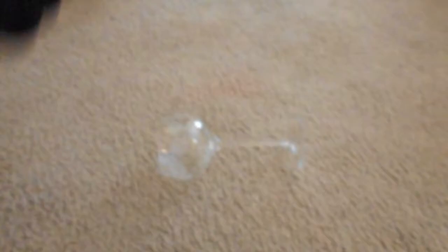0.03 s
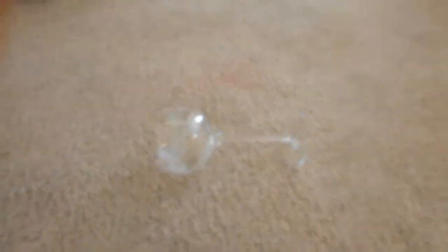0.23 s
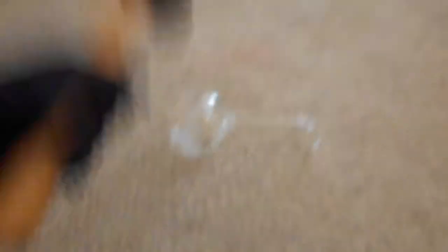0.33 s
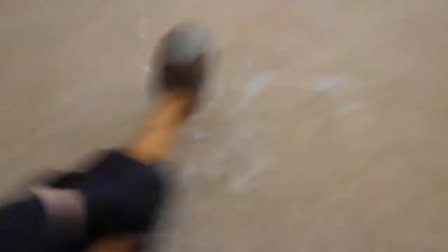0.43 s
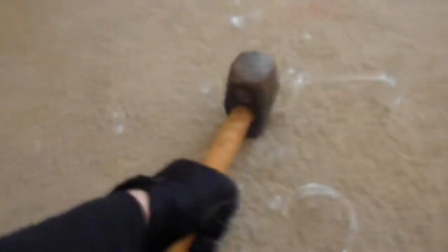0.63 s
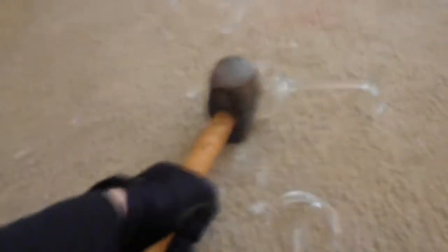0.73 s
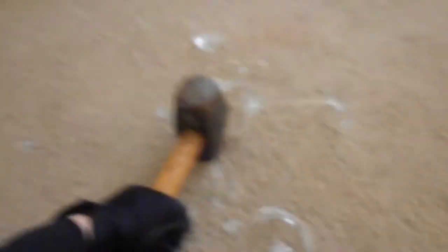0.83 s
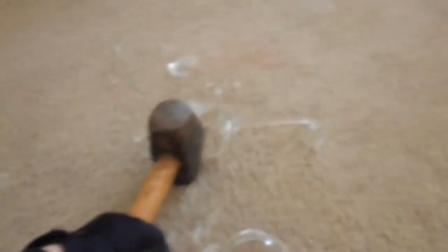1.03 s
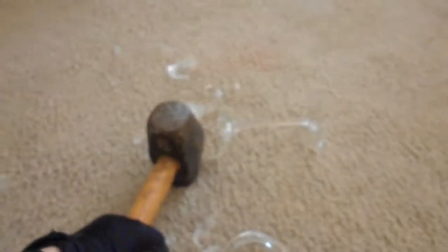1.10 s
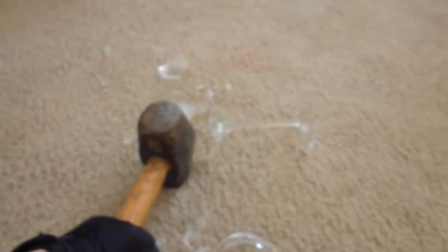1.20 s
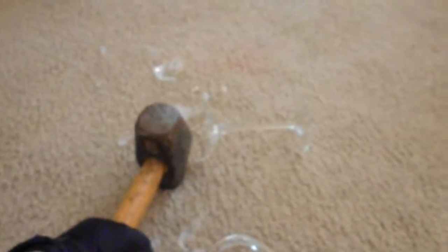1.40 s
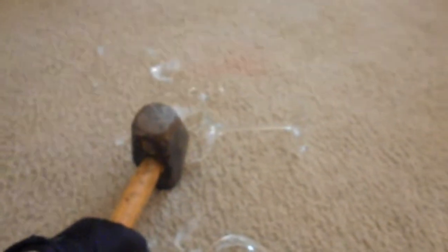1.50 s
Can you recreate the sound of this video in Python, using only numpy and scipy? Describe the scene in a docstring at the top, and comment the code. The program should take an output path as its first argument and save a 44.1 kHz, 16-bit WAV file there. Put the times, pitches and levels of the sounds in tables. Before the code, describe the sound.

A wine glass shatters under a hammer on carpet, shards clinking briefly afterwards.

```python
"""Hammer through a wine glass

A hammer smashes a wine glass lying on a carpet, in a small room. The bowl bursts in a dense run of
cracks, the head thuds through to the floor, shards clink against each other and grit patters down.
The recorder's gain control ducks at the blow, so hiss and rumble sink and slowly swell back."""
import sys
import numpy as np
from scipy import signal
from scipy.fft import rfft, irfft
from scipy.io import wavfile
from scipy.ndimage import uniform_filter1d, minimum_filter1d

SR = 44100
rng = np.random.default_rng(int(sys.argv[2]) if len(sys.argv) > 2 else 0)


def store_wav(level_fs):
    """Save 16-bit WAV to argv[1]."""
    pcm = np.round(np.clip(np.atleast_2d(level_fs), -1, 1) * 32767)
    wavfile.write(sys.argv[1], SR, pcm.T.astype(np.int16))


N = 68355
T = np.arange(N) / SR

# fader moves of the background bed: t/s, rumble level/dB, hiss level/dB
BED_LEVELS = [(0, -45.5, -57), (.2, -41.5, -53), (.4, -39.5, -51), (.6, -38, -39), (.75, -42, -51.5),
              (.9, -37.5, -51), (1.05, -42, -54), (1.3, -48, -55.5), (1.55, -43, -53)]
# tone curves of the rumble, hiss, scuff and cracks: f/Hz, relative spectral density/dB
RUMBLE_EQ = [(20, -4.5), (55, 4), (100, -3), (190, -5), (280, -16), (420, -32.5), (800, -72)]
HISS_EQ = [(200, 4.5), (550, 5.5), (1300, 1.5), (2200, -5), (4200, -1.5), (6500, -5.5), (10000, -8.5)]
SCUFF_EQ = [(300, -1), (700, -10), (1200, -4), (2200, -36), (6000, -36)]
CRACK_EQ = [(60, 4.5), (150, 2), (260, 5), (600, -3), (1300, -0.5), (2400, -5), (4000, -6), (6000, -5),
            (8500, 0), (10500, -0.5), (13000, -4.5)]
# small ticks during the swing: t/s, level/dB
SWING_TICKS = [(.1835, -37), (.268, -34), (.285, -41), (.3735, -27), (.3928, -34), (.4105, -38)]
# modes of each piece of glass, by name: f/Hz, relative level/dB, t60/s
SHARD_MODES = { "whole bowl": [(3760, -1, .07), (4290, -5, .12), (5650, 0, .12), (5770, -2, .1),
               (7073, -3, .1), (8629, -3, .1), (9410, -2, .08), (9590, -2, .1), (10424, -2, .12)],
               "broken bowl": [(3735, -5, .07), (4435, -14, .12), (5135, -11, .1), (5639, -10, .1),
               (6871, -11, .1), (7081, -5, .09), (7178, -10, .1), (7544, -13, .1), (8305, -11, .1),
               (9600, 0, .09), (9855, -4, .08), (10420, -11, .1)], "large": [(3727, 0, .37),
               (5122, -16, .35), (7179, -5, .42), (8295, -2, .2), (9608, -4, .08)],
               "curved": [(1848, -14, .8), (2735, -15, .6), (2785, -16, .5), (3972, -9, .27),
               (4400, -14, .3), (5122, -6, .25), (5636, -1, .2), (5787, -10, .2), (6023, -10, .28),
               (6355, -7, .28), (6385, -10, .22), (6863, -7, .2), (7090, -3, .2), (7668, -12, .2),
               (8296, -10, .13), (8644, -6, .25), (9640, 0, .18)], "medium": [(2770, -20, .15),
               (6030, 0, .135), (6857, -2, .085), (7669, -12, .13)], "narrow": [(4330, -14, .1),
               (5990, -11, .1), (7915, -2, .06)], "sliver": [(7088, 0, .08)], "flake": [(6025, -2, .13),
               (8947, 0, .04), (10562, -2, .07)], "chip": [(9087, 0, .12)], "speck": [(9603, 0, .1)],
               "shaving": [(5122, 0, .13)], "crumb": [(6850, 0, .06), (7060, -3, .03)]}
# hits on glass: t/s, piece, relative ring level/dB, tilt/(dB per octave), relative tick level/dB
SHARD_HITS = [(0.4212, "whole bowl", -15.5, -1.5, -15.5), (0.451, "broken bowl", -10.5, 1.5, -29.5),
              (0.463, "broken bowl", -7, -2, -19), (.477, "broken bowl", -4.5, 0, -19.5),
              (0.495, "curved", -15.5, 6, -18), (0.5247, "crumb", -22, 0, -9),
              (.561, "crumb", -22.5, -4, -12), (0.575, "sliver", -17, -2, -38),
              (.6248, "large", -33, -1, -21), (.6255, "narrow", -29, 0, -27), (.6685, "flake", -31, 0, -31),
              (.6805, "sliver", -29, 0, -13), (0.716, "narrow", -25.5, 0, -30),
              (.716, "large", -39, -4, -34), (.7463, "speck", -31, 0, -33), (.765, "crumb", -33, 0, -29),
              (.772, "crumb", -34, 0, -26), (.7972, "large", -28, 6, -22), (.806, "speck", -31, 0, -33),
              (.815, "shaving", -37, 0, -38), (.8488, "large", -32, -1, -28), (.87, "chip", -29, 0, -31),
              (.881, "chip", -34, 0, -29), (0.9588, "large", -44, 33, -19), (0.962, "medium", -30, 0, -36),
              (0.969, "medium", -27, 9, -32), (.988, "crumb", -29.5, -9.5, -23.5)]
# the head hits the carpeted floor: t/s, level/dB, starting f/Hz, final f/Hz, t60/s
FLOOR_HITS = [(0.447, 4.5, 356, 251, 0.024), (.469, -0.5, 1000, 286, .028)]
# force crushing the bowl: t/s, relative level/dB
CRUSH_FORCE = [(.42, 1.5), (.43, 0.5), (.446, -0.5), (.452, -4.5), (.475, -0.5), (.493, -3), (.501, -6.5),
               (.52, -18), (.545, -20.5), (.57, -32.5), (.61, -38)]


def from_db(db):
    """Decibels to gain."""
    return 10 ** (np.asarray(db) / 20)


def automation(rows):
    """Each column after the time column, drawn as a curve through every sample."""
    times, *columns = np.transpose(rows)
    return [np.interp(T, times, column) for column in columns]


def match_rms(x, envelope=1):
    """Scale a signal to the rms of an envelope."""
    return x * np.sqrt(np.mean(np.square(envelope)) / (np.mean(x ** 2) + 1e-20))


def equalise(x, curve):
    """Shape a steady signal with a tone curve; rms 1."""
    hz, db = np.transpose(curve)
    bins_hz = np.arange(N // 2 + 1) * SR / N + 1
    gain = from_db(np.interp(np.log(bins_hz), np.log(hz), db))
    return match_rms(irfft(rfft(x) * gain, N))


def decay(start, t60):
    """An envelope that jumps to 1 and dies away."""
    return (T >= start) * np.exp(-np.log(1000) * np.clip((T - start) / t60, 0, 10))


def ring(clicks, hz, t60):
    """One resonance: each click sets off a dying sine."""
    radius, angle = np.exp(-np.log(1000) / (t60 * SR)), 2 * np.pi * hz / SR
    feedback = [1, -2 * radius * np.cos(angle), radius ** 2]
    return signal.lfilter([0, np.sin(angle)], feedback, clicks + 1e-18)


def pings(clicks, pitches, t60_cycles):
    """Each click rings one fragment, picked at random; higher ones die sooner."""
    fragment = rng.integers(0, len(pitches), N)
    return sum(ring(clicks * (fragment == k), hz, t60_cycles / hz) for k, hz in enumerate(pitches))


def ticks(rows, t60, low_cut_hz):
    """Very short, bright bursts of contact noise."""
    bursts = rng.standard_normal(N) * sum(from_db(db) * decay(start, t60) for start, db in rows)
    return signal.sosfilt(signal.butter(3, low_cut_hz, "high", fs=SR, output="sos"), bursts + 1e-18)


def background():
    """The bed: low rumble and soft hiss of the room and the hand-held microphone."""
    rumble_db, hiss_db = automation(BED_LEVELS)
    rumble = from_db(rumble_db) * equalise(rng.standard_normal(N), RUMBLE_EQ)
    hiss = from_db(hiss_db) * equalise(rng.standard_normal(N), HISS_EQ)
    return rumble + hiss


def room(x, wet_db=-17, predelay_s=.008, t60=.25):
    """The short diffuse tail of a carpeted room."""
    tail = rng.standard_normal(N) * decay(predelay_s, t60)
    return from_db(wet_db) * signal.fftconvolve(x, tail / np.sqrt(np.sum(tail ** 2)))[:N]


def swing(squeak_hz=1346):
    """The lead-in: faint ticks, a scuff and one tiny squeak as the hammer comes down."""
    def swell(at_s, width_s, db):
        return from_db(db) * np.exp(-((T - at_s) / width_s) ** 2)

    squeak = swell(at_s=.3997, width_s=.0011, db=-31.5) * np.sin(2 * np.pi * squeak_hz * T)
    scuff = swell(at_s=.271, width_s=.0056, db=-45.5) * equalise(rng.standard_normal(N), SCUFF_EQ)
    return squeak + scuff + ticks(SWING_TICKS, t60=.0034, low_cut_hz=1500)


def grit(landings_per_s=260, base_db=-37, spread_db=3):
    """Tiny fragments land at random, each with a short ping, ever more softly."""
    pitches_hz = rng.uniform(5610, 10360, size=30)
    sizes = from_db(base_db + spread_db * np.minimum(rng.exponential(1, N), 2))
    landings = sizes * (rng.random(N) < landings_per_s / SR) * decay(start=.53, t60=.9)
    return pings(landings, pitches_hz, t60_cycles=220)


def clinks(ring_trim_db=1.5, spread_db=.6, pivot_hz=7100, settle_s=.96, damping_db_per_s=110):
    """Each collision gives a tick and adds energy to every mode of the shard that is hit."""
    glass = ticks([(start, db) for start, *_, db in SHARD_HITS], t60=.01, low_cut_hz=4800)
    for shard, modes in SHARD_MODES.items():
        hits = [(start, db, tilt) for start, piece, db, tilt, _ in SHARD_HITS if piece == shard]
        for hz, mode_db, t60 in modes:
            octaves = np.log2(hz / pivot_hz)
            energy = 0
            for start, hit_db, tilt in hits:
                strike_db = hit_db + mode_db + tilt * octaves + spread_db * rng.standard_normal()
                energy += (from_db(strike_db) * decay(start, t60)) ** 2
            envelope = uniform_filter1d(np.sqrt(energy), size=24)  # takes the edge off the attack
            glass += from_db(ring_trim_db) * envelope * np.sin(2 * np.pi * (hz * T + rng.random()))
    # the pieces come to rest and the carpet damps them
    return glass * from_db(-damping_db_per_s * np.maximum(T - settle_s, 0))


def thuds(attack_s=.0022, sag_s=.00273):
    """The weight: the head lands twice, each knock dropping in pitch as it sinks into the carpet."""
    knocks = 0
    for start, db, first_hz, last_hz, t60 in FLOOR_HITS:
        age = np.maximum(T - start, 0)
        cycles = last_hz * age + (first_hz - last_hz) * sag_s * (1 - np.exp(-age / sag_s))
        envelope = from_db(db) * decay(start, t60) * (1 - np.exp(-age / attack_s))
        knocks -= envelope * np.sin(2 * np.pi * cycles)
    return knocks


def cracks(per_s=7200, spread_db=4):
    """A dense random train of fractures of uneven size."""
    sizes = from_db(spread_db * np.minimum(rng.exponential(1, N), 3))
    polarity = rng.choice([-1, 1], N)
    return sizes * polarity * (rng.random(N) < per_s / SR)


def smash(crunch_db=-8.5, splinter_db=-16):
    """The bowl bursts: cracks sound directly as a crunch and set many splinters ringing."""
    contact_s, end_s = SHARD_HITS[0][0], CRUSH_FORCE[-1][0]
    force = from_db(automation(CRUSH_FORCE)[0]) * (T >= contact_s) * (T < end_s)
    crunch = force * equalise(cracks(), CRACK_EQ)
    pitches_hz = rng.uniform(3477, 10720, size=48)
    splinters = pings(cracks() * force, pitches_hz, t60_cycles=500)
    return from_db(crunch_db) * crunch + from_db(splinter_db) * match_rms(splinters, force)


def scene():
    """The mono mix: the blow and its debris with room tail, over the swing and the bed."""
    blow = smash() + thuds() + clinks() + grit()
    return (blow + room(blow) + swing() + background())[None]


def gain_control(x, threshold_db=-26, hold_s=.45, release_db_per_s=53):
    """Ducks just ahead of a loud sound, holds, then recovers at a steady rate."""
    level_db = 10 * np.log10(np.maximum(uniform_filter1d(x ** 2, size=600), 1e-12))
    over_db = np.maximum(level_db - threshold_db, 0)
    half_hold = int(hold_s * SR) // 2
    # the largest overshoot within the past hold time
    held_db = -minimum_filter1d(-over_db, 2 * half_hold + 1, origin=half_hold, mode="constant")
    release_ramp = release_db_per_s * T
    duck_db = np.maximum.accumulate(held_db + release_ramp) - release_ramp
    return x * from_db(-uniform_filter1d(duck_db, size=40))


def record(dry, ceiling=.13, high_cut_hz=10617):
    """The output chain: gain control, soft-clipped peaks, then a steep high cut."""
    rounded = ceiling * np.tanh(gain_control(dry[0]) / ceiling)
    high_cut = signal.ellip(10, .2, 65, high_cut_hz, fs=SR, output="sos")
    return signal.sosfilt(high_cut, rounded)[None]


dry = scene()
out = record(dry)
store_wav(out)
```